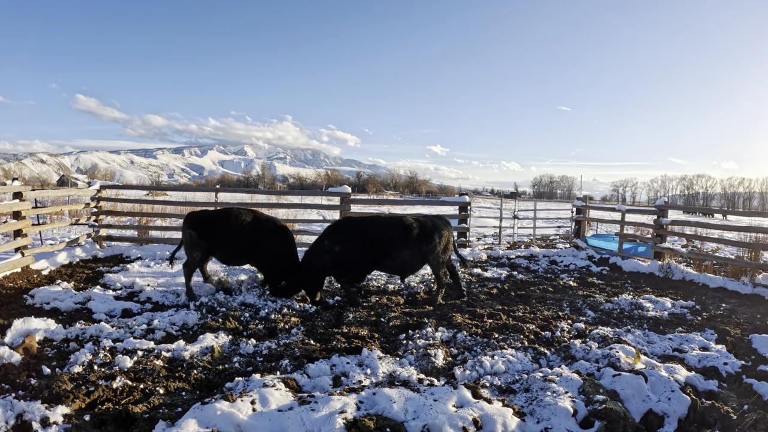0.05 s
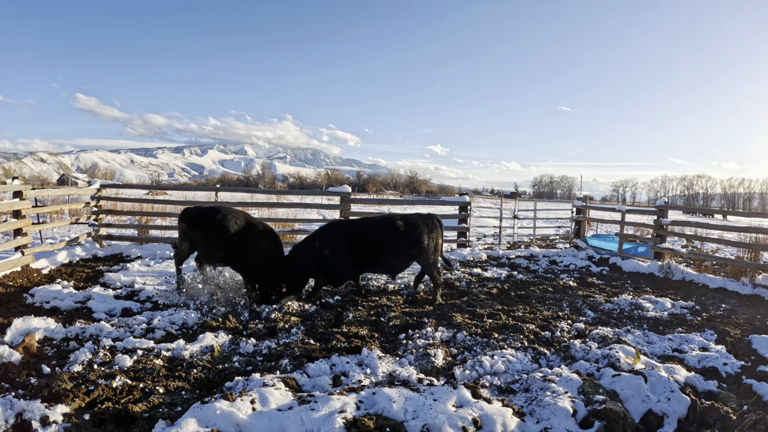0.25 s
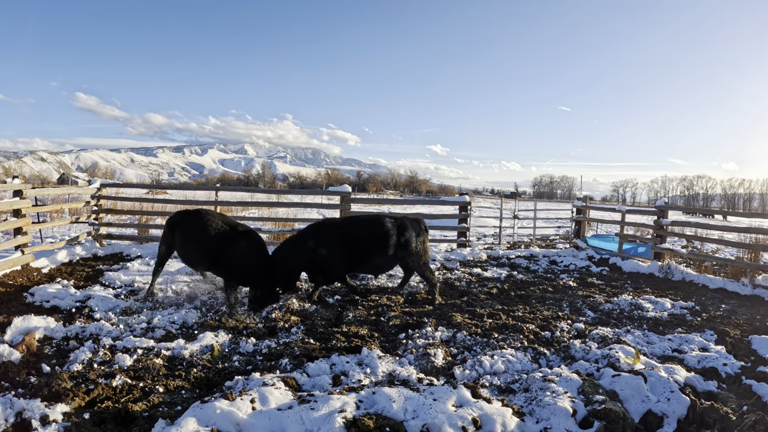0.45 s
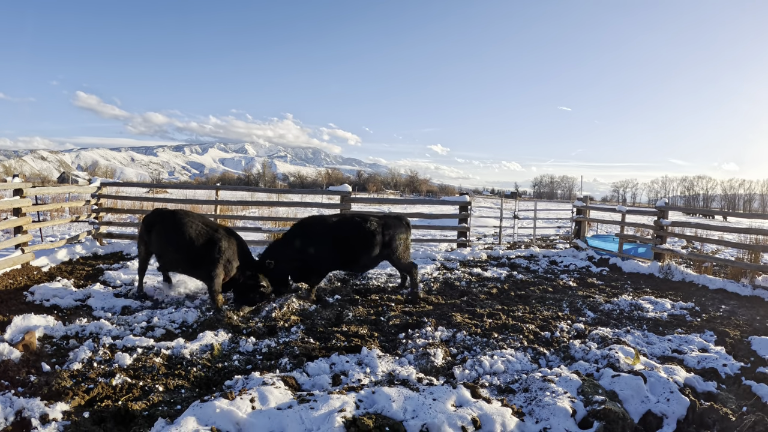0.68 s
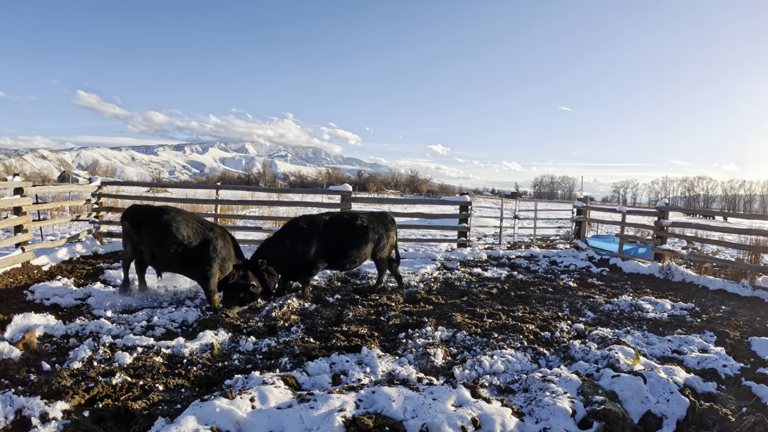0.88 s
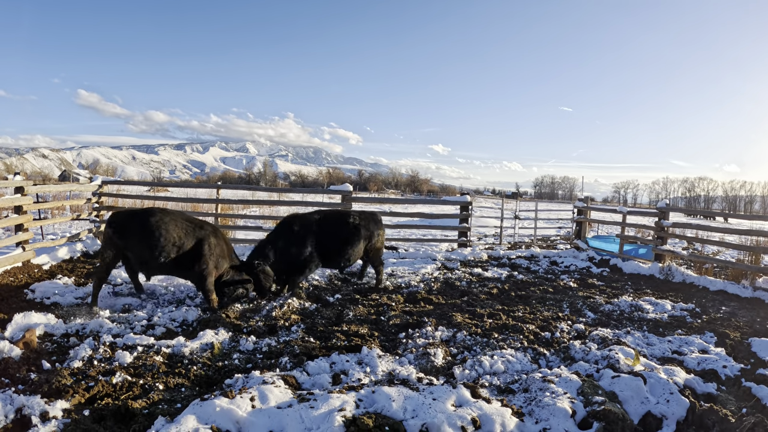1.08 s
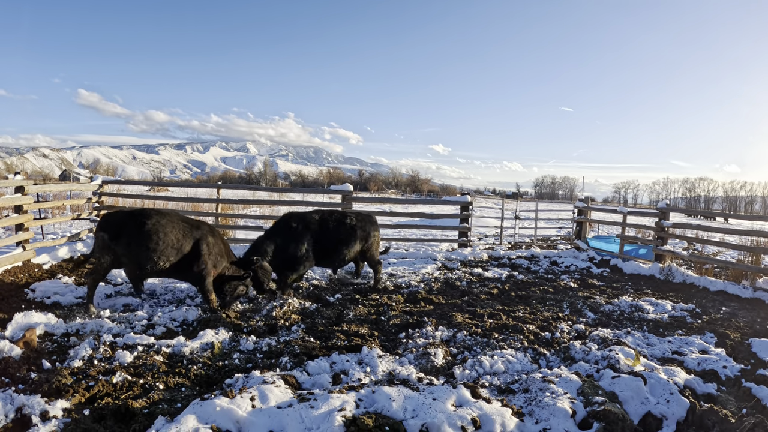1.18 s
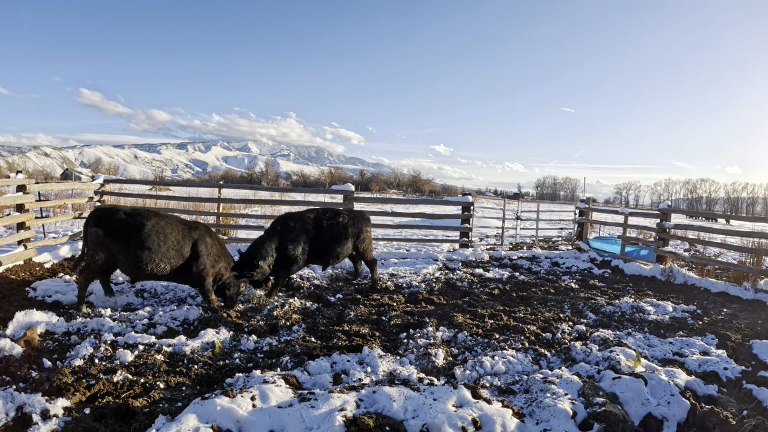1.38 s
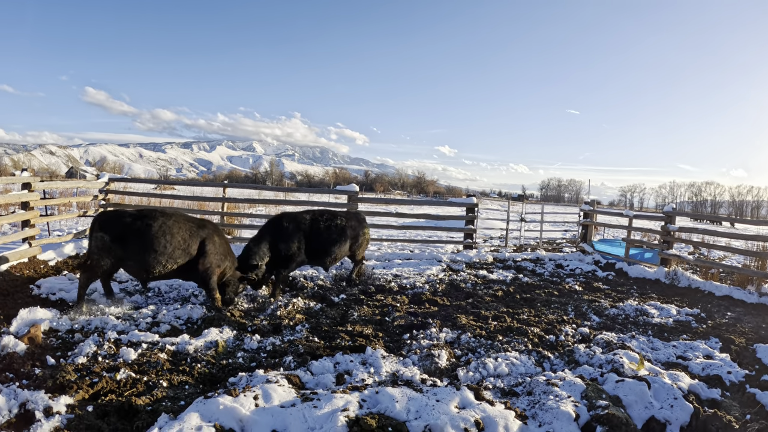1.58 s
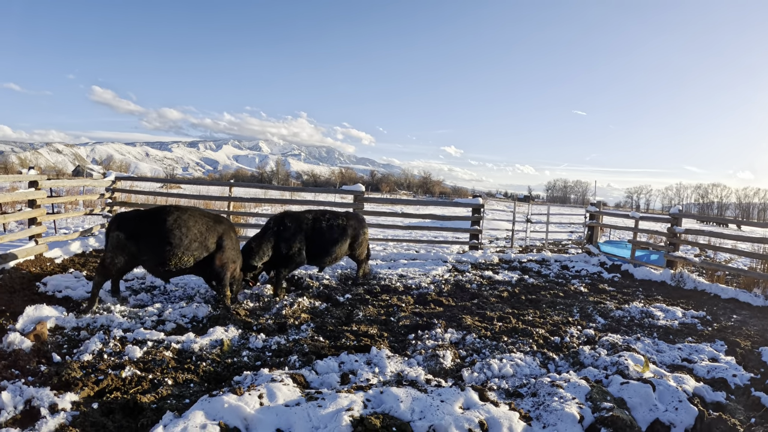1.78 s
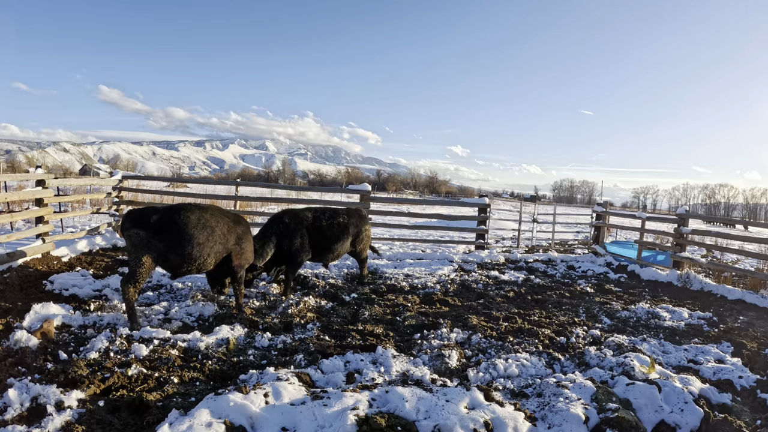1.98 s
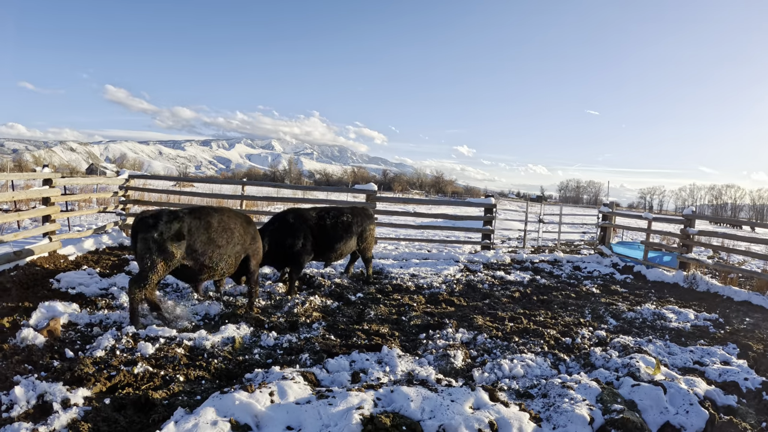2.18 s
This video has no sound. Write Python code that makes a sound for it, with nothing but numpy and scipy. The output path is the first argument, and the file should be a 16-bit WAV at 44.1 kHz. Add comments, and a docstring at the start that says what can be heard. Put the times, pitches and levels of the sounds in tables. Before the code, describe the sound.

Two bulls snort and scuffle in a muddy, snowy corral some metres away, over soft wind. A hollow gust and a snap of frozen crust open. At 0.3 seconds comes a hard, fluttering, slightly whistling snort. A hoof skids through grit from 0.6 seconds, and two more snorts follow at 0.9 and 1.2. From 1.65 seconds one bull huffs with a low rattling growl, over hoof thuds and crunches.

```python
"""Two bulls push head to head in a muddy, snowy corral, some metres away.
A hollow gust opens over soft wind; frozen crust snaps, hooves thud and crunch in the mud.
At 0.3 s a hard snort: air, chopped by the flapping nostrils, rings them and whistles.
A hoof skids through grit from 0.6 s, kicking up snow; two more snorts follow at 0.9 and 1.2 s.
From 1.65 s one bull huffs, a low rattling growl on heaves of the chest, over more scuffs."""
import sys
import numpy as np
from scipy import signal
from scipy.fft import rfft, irfft
from scipy.io import wavfile

SR = 44100
rng = np.random.default_rng(int(sys.argv[2]) if len(sys.argv) > 2 else 0)


def dump_mix(stems):
    """Bounce the given channels to the path in sys.argv[1] as a 16-bit WAV at rate SR."""
    frames = np.atleast_2d(stems).T  # one column per channel
    limited = np.clip(frames, -1, 1)  # hard clip at full scale
    pcm = np.round(limited * 32767).astype(np.int16)
    wavfile.write(sys.argv[1], SR, pcm)


N = 99225
T = np.arange(N) / SR
HZ = np.fft.rfftfreq(N, 1 / SR)

SNORT_FLOW = [
    [(.27, -38), (.29, -41), (.318, -27.5), (.345, -23), (.38, -20), (.425, -22), (.46, -27.5),
     (.48, -36.5), (.5, -59)],
    [(.86, -39), (.895, -40), (.913, -34), (.927, -29.5), (.94, -34.5), (.957, -37.5), (.98, -76)],
    [(1.05, -49), (1.14, -37), (1.18, -31.5), (1.25, -32), (1.295, -31), (1.325, -32.5), (1.345, -48),
     (1.38, -46.5)],
]  # air flow, per snort: t/s, level/dB
NOSTRIL_MODES = [
    [(1155, 120, -5.5), (1590, 165, -1), (1940, 96, 1), (2196, 214, -5), (2420, 380, -5.5),
     (3120, 360, -8.5), (5890, 200, -20.5)],
    [(1380, 380, 2), (1846, 170, 7), (2060, 210, 3), (2520, 510, 5)],
    [(1510, 157, -3), (1920, 500, -6), (2150, 510, -9.5), (2800, 290, -8), (3420, 450, -11)],
]  # resonances, per snort: f/Hz, width/Hz, level/dB
NOSTRIL_FLARE = [
    [(.31, 1), (.36, 0.975), (.415, 1.034), (.48, 0.97)],
    [(.89, 0.982), (.96, 1.04)],
    [(1.16, 0.96), (1.22, 1.01), (1.28, 0.98), (1.33, 1.05)],
]  # mode shift as nostrils flare and relax, per snort: t/s, f ratio
SNORT_BALANCE = [(-0.5, -9, -8), (4.5, -4, -10), (0.2, -9, -4.5)]  # per snort: nostril/dB, jet/dB, chest/dB
JET_SPECTRUM = [(500, -25), (1000, -7), (1500, 2.5), (2500, -3), (3500, 0), (4500, 0), (5700, -9.5),
                (7000, -7), (8000, -23.5), (11500, -21.5), (14000, -22)]  # nasal hiss: f/Hz, level/dB
CHEST_SPECTRUM = [(30, -35), (70, -17.5), (130, -9.5), (195, 5), (270, -7), (400, 2.5), (520, -9),
                  (680, -2), (950, -16), (1500, -6.5), (4000, -55)]  # body of a snort: f/Hz, level/dB
WHISTLE_GLIDES = [(0.323, 0.371, 1505, 1610, -24), (0.374, 0.384, 1820, 1960, -29),
                  (0.381, 0.452, 2056, 2230, -28), (0.452, 0.514, 1680, 1570, -43),
                  (1.185, 1.305, 1420, 1603, -33), (1.206, 1.306, 2036, 2510, -33)]  # tight nostril: start/s, end/s, start f/Hz, end f/Hz, level/dB

GROWL_LEVEL = [(1.648, -39.5), (1.68, -37), (1.712, -40.5), (1.766, -33.5), (1.808, -36), (1.836, -34),
               (1.875, -41), (1.9, -35.5), (1.935, -33.5), (1.96, -41.5), (2.1, -51), (2.184, -43)]  # throat envelope: t/s, level/dB
GROWL_PITCH = [(1.68, 415), (1.775, 520), (1.8, 490), (1.83, 436), (1.94, 421.4), (2.05, 397), (2.2, 456)]  # throat pitch: t/s, f/Hz
CHEST_HEAVES = [(1.782, 0.023, -38.5, -37), (1.846, 0.018, -34.5, -35.5), (1.904, 0.021, -41.5, -40.5),
                (1.951, .02, -44, -38), (1.995, 0.019, -41.5, -49)]  # pushes of breath: peak t/s, spread/s, chest/dB, air/dB
BREATH_SPECTRUM = [(200, -8.5), (550, 1.5), (850, -1), (1400, 2.5), (2200, -0.5), (3500, -10), (6000, -27),
                   (12000, -46)]  # heaved air: f/Hz, level/dB

SKID_LEVEL = [(.57, -46.5), (.61, -45.5), (.64, -40.5), (.665, -33.5), (.71, -30.5), (.742, -25.5),
              (.783, -22.5), (.805, -27), (.825, -34), (.9, -38.5)]  # long hoof slide: t/s, level/dB
SKID_SPECTRUM = [(60, -25), (130, -32), (200, 9.5), (300, -40), (430, -2), (580, 3.5), (800, 1.5),
                 (1100, -2), (1600, 0), (2100, 1.5), (2750, 4.5), (3400, 2.5), (4300, 1), (5500, -6.5),
                 (7200, -10), (11500, -29)]  # its grit: f/Hz, level/dB
HOOF_SCUFFS = [(.17, 0.025, 0.064, -43, 2860), (0.241, 0.026, 0.012, -37, 2120),
               (0.622, .003, 0.0055, -35, 3550), (.72, 0.015, 0.03, -36.5, 3870),
               (1.07, 0.075, 0.24, -48, 3700), (1.315, 0.025, 0.035, -41.5, 3650),
               (1.625, 0.0022, 0.018, -51, 3500), (1.88, 0.028, 0.04, -48, 4460),
               (1.96, 0.013, 0.028, -44.5, 3280), (2.065, 0.0022, 0.0099, -44.5, 4400),
               (2.122, 0.047, 0.018, -43.5, 3330), (2.144, 0.007, 0.029, -40.5, 3100)]  # short drags: peak t/s, rise/s, fall/s, level/dB, f/Hz
CRUST_SNAPS = [(0.091, -24, 2960), (0.0912, -24, 6540), (0.0923, -23.5, 790), (0.5424, -20, 2960),
               (0.603, -31, 9000), (0.835, -23, 2550), (1.497, -36.5, 4100), (1.624, -25.5, 2900),
               (1.735, -46, 3800), (1.874, -28, 2780), (1.953, -27, 2800), (2.065, -30, 4000),
               (2.123, -29, 3500)]  # ice breaking: t/s, peak level/dB, f/Hz
HOOF_THUDS = [(.245, -37, 50), (0.352, -28.5, 94), (0.416, -35, 187), (0.911, -28.5, 142), (1.278, -37, 80),
              (1.61, -37.5, 117), (1.905, -29.5, 121)]  # hoof falls: t/s, level/dB, f/Hz
MUD_SHOVES = [(.245, 0.062, -40.5, 350), (.665, 0.021, -37, 603), (.93, 0.037, -37.5, 546),
              (1.175, 0.046, -36, 437)]  # mud yielding: peak t/s, spread/s, level/dB, f/Hz
SNOW_KICKS = [(.825, 0.03, -38.5), (2.115, 0.038, -49)]  # loose snow: peak t/s, spread/s, level/dB
SNOW_SPECTRUM = [(3000, -25), (6000, 3), (8000, 2), (12000, -6), (14000, -2)]  # its hiss: f/Hz, level/dB

WIND_SPECTRUM = [(25, -1), (45, -6), (70, -3.5), (110, -1.5), (200, 2.5), (300, 3), (500, 0.5), (800, 2.5),
                 (1150, -1.5), (1700, -5), (2500, -6.5), (4000, -12), (7000, -20), (11500, -29.5)]  # outdoor wash: f/Hz, level/dB
WIND_LEVEL = [(0, -39), (.2, -39), (.5, -42), (.7, -37), (1.0, -40), (1.35, -41), (1.55, -42), (1.9, -37.5),
              (2.25, -42)]  # wash envelope: t/s, level/dB
GUST_LEVEL = [(0, -41.5), (.12, -43.5), (.28, -40), (.5, -54), (.6, -64), (.67, -47), (.75, -37),
              (.85, -75)]  # hollow rush: t/s, level/dB
MIC_RESPONSE = [(0, -25), (30, -15.5), (65, -1), (7300, -4), (8000, -10.5), (8500, -24), (8950, -34),
                (9400, -16.5), (10200, -9.5), (11500, -5.5), (12600, -13.5), (13500, -25), (14200, -36)]  # microphone: f/Hz, gain/dB

FLAP_HZ, FLAP_DEPTH = 160, 0.21
RATTLE_HZ, RATTLE_DEPTH = 91.8, 0.59
SNAP_DECAY_S, THUD_RISE_S, THUD_DECAY_S = 0.0034, 0.0037, 0.0043
CRUMBS_PER_S, CRUMBS_DB = 77, -66.5
GROUND_DAMPING_HZ = 8200  # wet ground swallows the treble
EDGE_HZ = 14000


def snort(flow, modes, balance_db, flare):
    """Air chopped by unevenly flapping nostrils rings them; jet hiss above, chest below."""
    nose_db, jet_db, chest_db = balance_db
    stretch = curve(flare)
    flutter = waver(217, depth_db=1) * (1 + FLAP_DEPTH * vibrate(FLAP_HZ, jitter=0.2504))
    ringing = sum(amp(db) * resonate(white(), hz * stretch, width_hz) for hz, width_hz, db in modes)
    nose = unit(flutter * ringing)
    jet = colour(white() * flutter, JET_SPECTRUM)
    chest = colour(white() * flutter, CHEST_SPECTRUM)
    return level(flow) * (amp(nose_db) * nose + amp(jet_db) * jet + amp(chest_db) * chest)


def whistles():
    """Air through a tight nostril: fuzzy tones gliding inside the snorts."""
    out = np.zeros(N)
    for start_s, end_s, from_hz, to_hz, db in WHISTLE_GLIDES:
        progress = np.clip((T - start_s) / (end_s - start_s), 0, 1)
        tone = unit(resonate(white(), from_hz + (to_hz - from_hz) * progress, width_hz=76))
        out += amp(db) * np.sin(np.pi * progress) * tone
    return out


def huff():
    """A rattling growl rises and falls in the throat while the chest heaves air out."""
    pitch_hz = curve(GROWL_PITCH)
    rattle = unit(1 + RATTLE_DEPTH * vibrate(RATTLE_HZ, jitter=0.19))
    voice = amp(-2) * unit(vibrate(pitch_hz, jitter=0.0398))
    breath = unit(resonate(white(), pitch_hz, width_hz=127))
    chest = unit(resonate(white(), 195.4, width_hz=40) + amp(-10) * resonate(white(), 263, width_hz=87))
    air = colour(white(), BREATH_SPECTRUM)
    heaves = sum(swell(s, spread_s) * (amp(chest_db) * chest + amp(air_db) * air)
                 for s, spread_s, chest_db, air_db in CHEST_HEAVES)
    return (voice + breath) * rattle * level(GROWL_LEVEL) + heaves


def skid():
    """One long hoof slide through gritty mud."""
    grit = grains() * waver(130, depth_db=1.3)
    return amp(1.5) * level(SKID_LEVEL) * colour(grit, SKID_SPECTRUM)


def scuffs():
    """Short hoof drags break the mud in clumps."""
    out = np.zeros(N)
    for s, rise_s, fall_s, db, hz in HOOF_SCUFFS:
        stroke = swell(s, np.where(T < s, rise_s, fall_s))
        crunch = grains(per_s=7600) * waver(129, depth_db=0.8)
        out += amp(db) * stroke * band(crunch, hz, octaves=0.74)
    return out


def snaps():
    """Frozen crust breaks: one crack, then a short crumble."""
    out = np.zeros(N)
    for s, db, hz in CRUST_SNAPS:
        burst = white() * (T >= s) * np.exp(-abs(T - s) / SNAP_DECAY_S)
        burst[round(s * SR)] = 5  # the crack
        tick = band(burst, hz, octaves=0.83, damping_hz=7100)
        out += amp(db) * tick / abs(tick).max()
    return out


def thuds():
    """Heavy hooves give soft ground a short, damped push."""
    out = np.zeros(N)
    for s, db, hz in HOOF_THUDS:
        age_s = np.maximum(T - s, 0)
        push = (1 - np.exp(-age_s / THUD_RISE_S)) ** 2 * np.exp(-age_s / THUD_DECAY_S)
        ground = .8 * np.sin(2 * np.pi * hz * age_s) + .22 * band(white(), hz, octaves=0.48)
        out += amp(db) * push / push.max() * ground
    return out


def shoves():
    """Soft mud gives way under the bulls' weight."""
    return sum(amp(db) * swell(s, spread_s) * band(white(), hz, octaves=0.38)
               for s, spread_s, db, hz in MUD_SHOVES)


def snow():
    """Kicked snow hisses briefly; icy crumbs tick underfoot throughout."""
    kicks = sum(amp(db) * swell(s, spread_s) for s, spread_s, db in SNOW_KICKS)
    ticks = white() * (rng.random(N) < CRUMBS_PER_S / SR)
    crumbs = band(ticks, hz=4800, octaves=0.86)
    return kicks * colour(grains(), SNOW_SPECTRUM) + amp(CRUMBS_DB) * crumbs


def wind():
    """Soft wash with an early, hollow gust."""
    wash = colour(white() * waver(45, depth_db=1), WIND_SPECTRUM) * level(WIND_LEVEL)
    gust = band(white(), hz=697, octaves=0.18) * level(GUST_LEVEL)
    return wash + gust


def amp(db):
    """dB to gain."""
    return 10 ** (np.asarray(db) / 20)


def unit(x):
    """Scale to rms 1."""
    return x / np.sqrt(np.mean(x ** 2) + 1e-20)


def white():
    """Fresh white noise."""
    return rng.standard_normal(N)


def curve(points):
    """Linear track through (t/s, value) points."""
    return np.interp(T, *np.transpose(points))


def level(points):
    """Gain along a dB curve, falling 230 dB/s beyond its ends."""
    s, db = np.transpose(points)
    outside_s = np.maximum(s[0] - T, 0) + np.maximum(T - s[-1], 0)
    return amp(np.interp(T, s, db) - 230 * outside_s)


def swell(peak_s, spread_s):
    """Gaussian envelope, peak 1."""
    return np.exp(-.5 * ((T - peak_s) / spread_s) ** 2)


def colour(x, spectrum):
    """Filter by (f/Hz, level/dB) points; rms 1."""
    hz, db = np.transpose(spectrum)
    gain = amp(np.interp(np.log(HZ + 1), np.log(hz + 1), db))
    return unit(irfft(rfft(x) * gain, N))


def band(x, hz, octaves, damping_hz=GROUND_DAMPING_HZ):
    """Bell-shaped band with damped treble; rms 1."""
    bell = np.exp(-.5 * (np.log2((HZ + 1) / hz) / octaves) ** 2)
    return unit(irfft(rfft(x) * bell / np.sqrt(1 + (HZ / damping_hz) ** 8), N))


def resonate(x, hz, width_hz):
    """Steep resonance of gain 1; hz may glide."""
    carrier = np.exp(2j * np.pi * np.cumsum(hz * np.ones(N)) / SR)
    pole = np.exp(-np.pi * width_hz * np.sqrt(2) / SR)
    baseband = signal.lfilter([(1 - pole) ** 2], [1, -2 * pole, pole * pole], x / carrier)
    return 2 * (carrier * baseband).real


def drift(rate_hz):
    """Random motion up to rate_hz; rms 1."""
    return unit(irfft(rfft(white()) / (1 + (HZ / rate_hz) ** 4), N))


def waver(rate_hz, depth_db):
    """Randomly drifting gain; rms 1."""
    return unit(amp(depth_db * drift(rate_hz)))


def vibrate(hz, jitter):
    """Soft tissue swinging at an unsteady rate."""
    return np.sin(2 * np.pi * np.cumsum(hz * (1 + jitter * drift(rate_hz=84))) / SR)


def grains(per_s=8300, spread_db=2.5):
    """Dense clicks of crumbling mud and snow, a few large."""
    size = amp(spread_db * np.minimum(rng.exponential(1, N), 4))
    return size * np.sign(white()) * (rng.random(N) < per_s / SR)


def scene():
    """Breath, hooves and wind in open air; mono."""
    snorts = sum(snort(*row) for row in zip(SNORT_FLOW, NOSTRIL_MODES, SNORT_BALANCE, NOSTRIL_FLARE))
    breath = snorts + whistles() + huff()
    hooves = skid() + scuffs() + shoves() + snow() + snaps() + thuds()
    return (breath + hooves + wind())[None]


def record(dry):
    """Small microphone with a deep treble notch, then the band limit."""
    mic_gain = amp(np.interp(HZ, *np.transpose(MIC_RESPONSE)))
    heard = irfft(rfft(dry) * mic_gain, N)
    lowpass = signal.firwin(511, EDGE_HZ, window=("kaiser", 9), fs=SR)
    return signal.oaconvolve(heard, lowpass[None], "same")


dry = scene()
out = record(dry)
dump_mix(out)
```